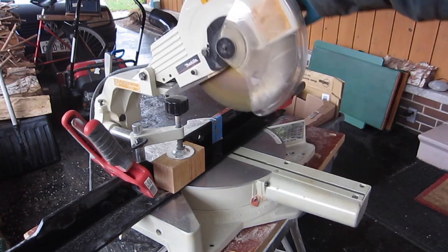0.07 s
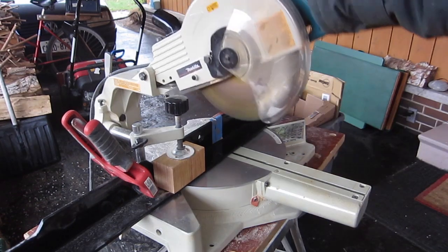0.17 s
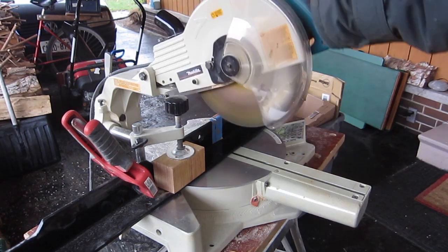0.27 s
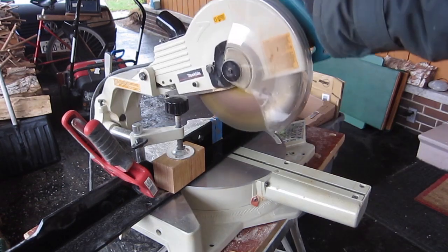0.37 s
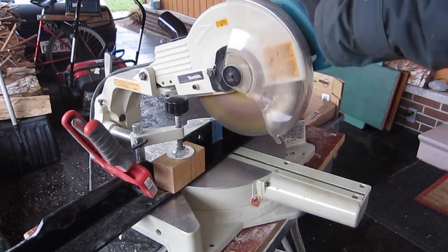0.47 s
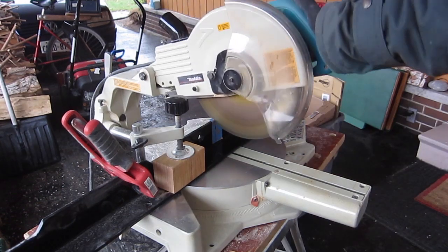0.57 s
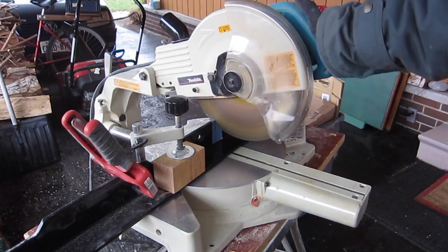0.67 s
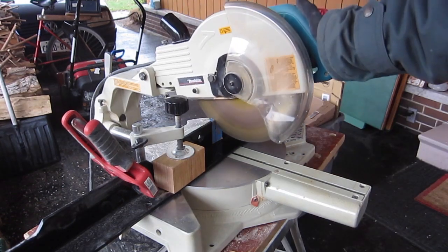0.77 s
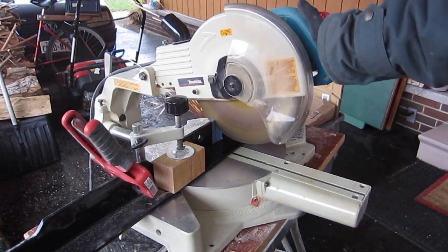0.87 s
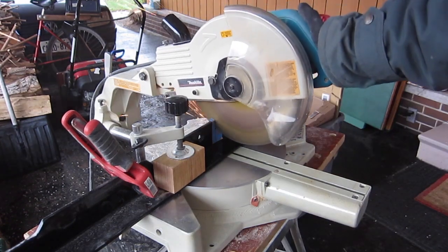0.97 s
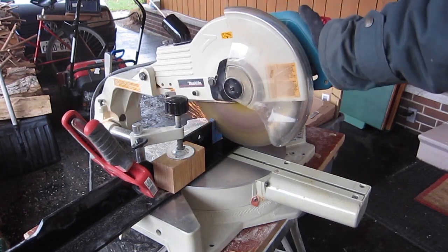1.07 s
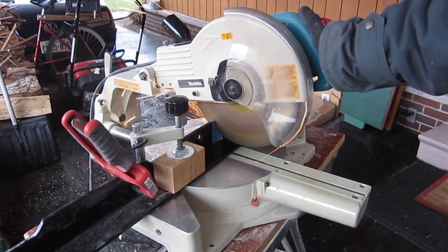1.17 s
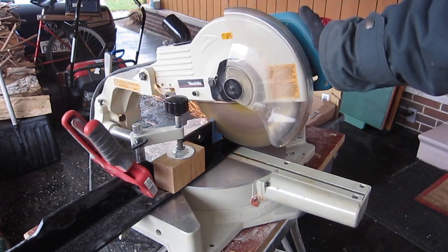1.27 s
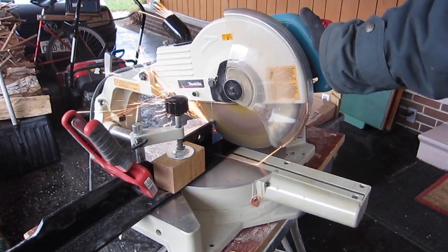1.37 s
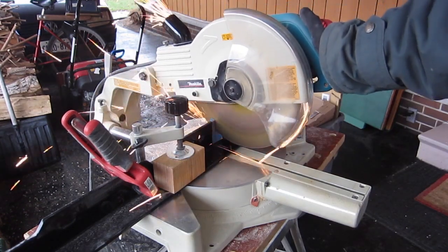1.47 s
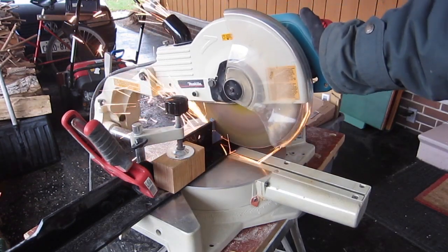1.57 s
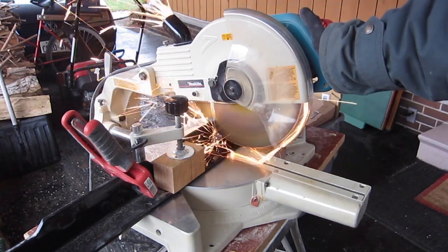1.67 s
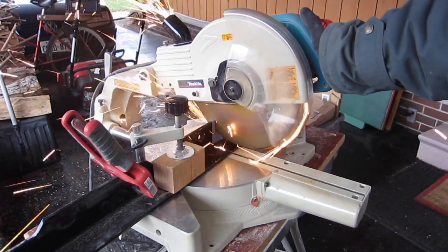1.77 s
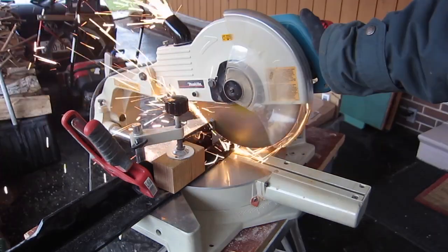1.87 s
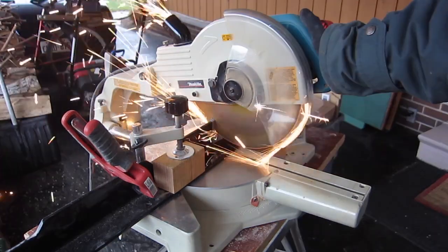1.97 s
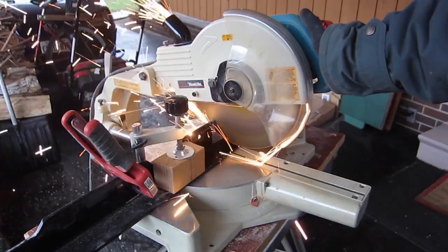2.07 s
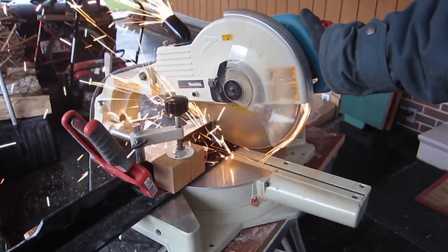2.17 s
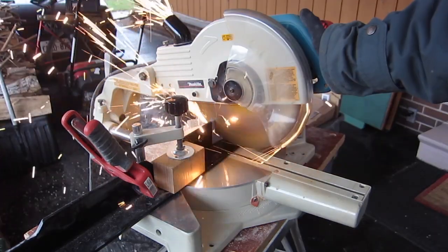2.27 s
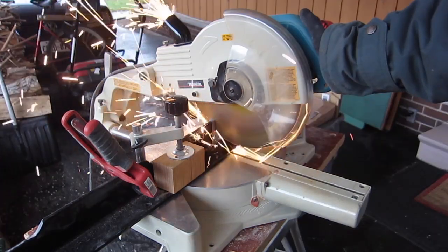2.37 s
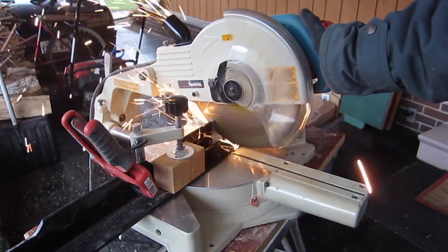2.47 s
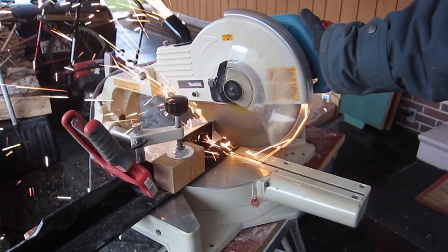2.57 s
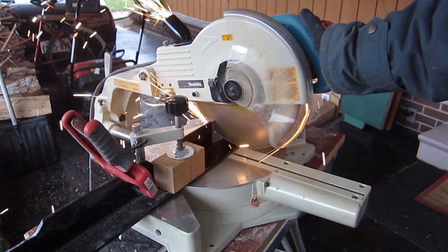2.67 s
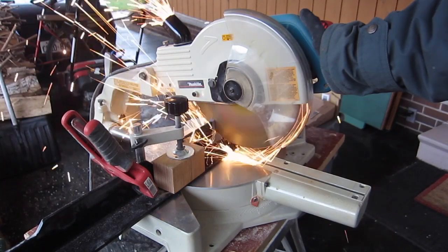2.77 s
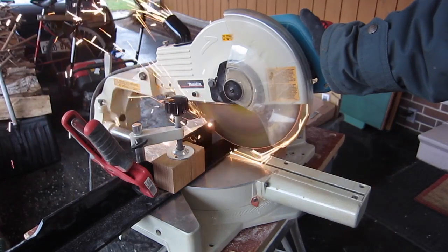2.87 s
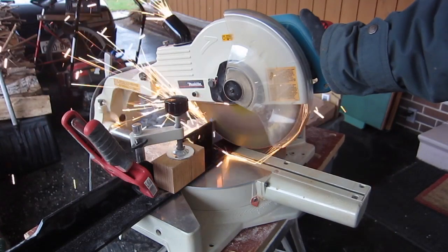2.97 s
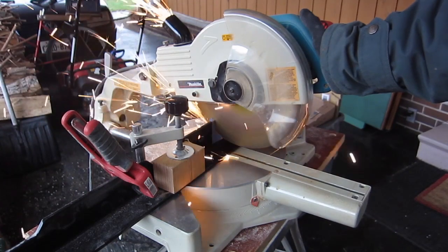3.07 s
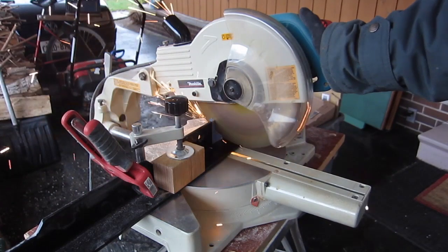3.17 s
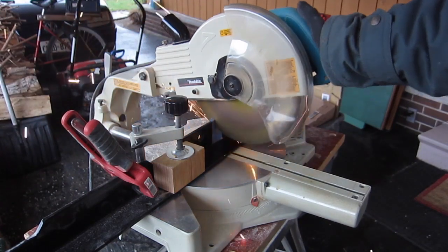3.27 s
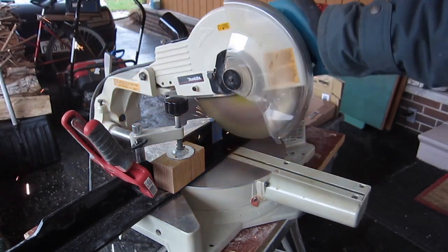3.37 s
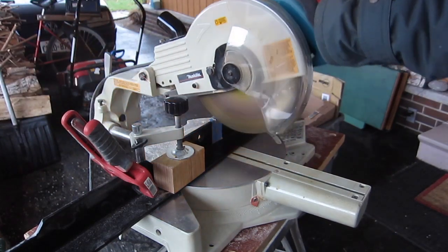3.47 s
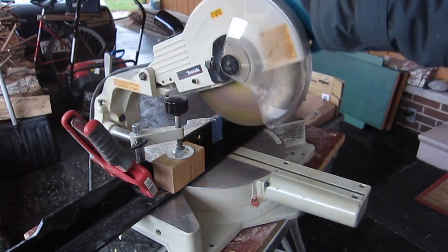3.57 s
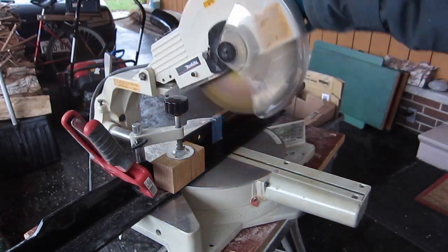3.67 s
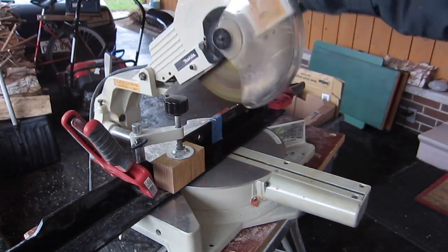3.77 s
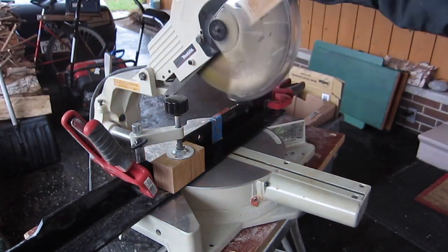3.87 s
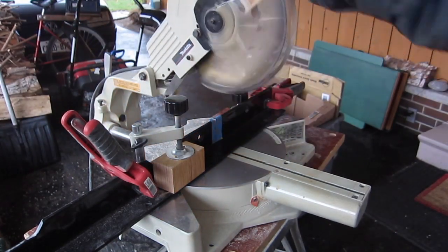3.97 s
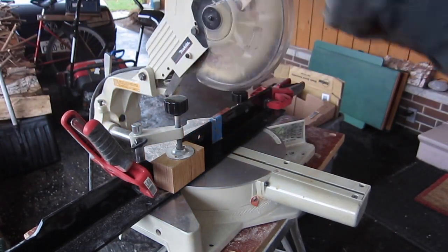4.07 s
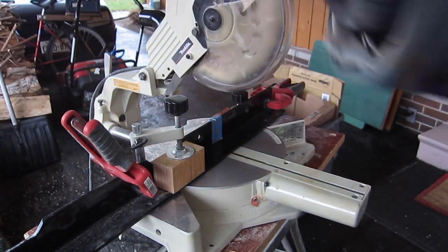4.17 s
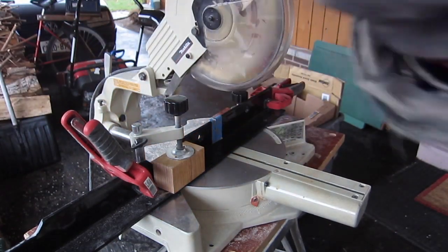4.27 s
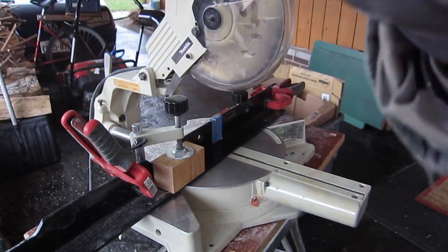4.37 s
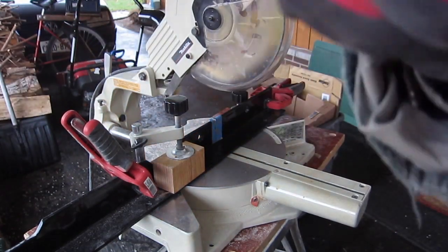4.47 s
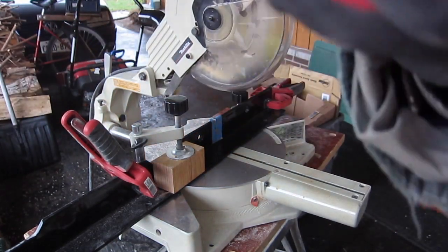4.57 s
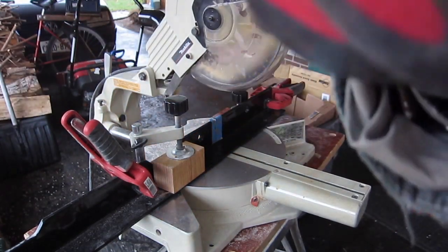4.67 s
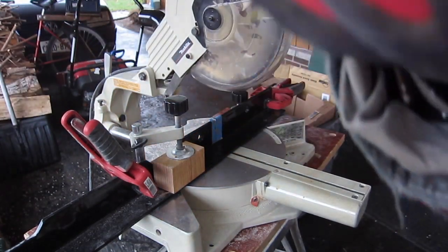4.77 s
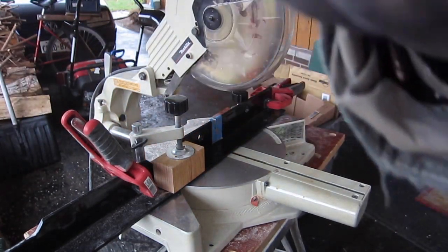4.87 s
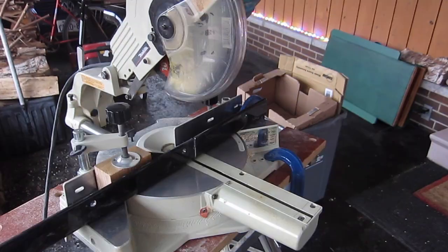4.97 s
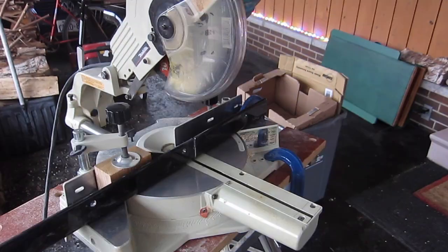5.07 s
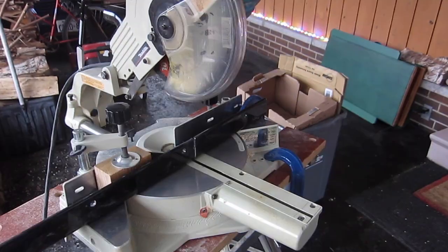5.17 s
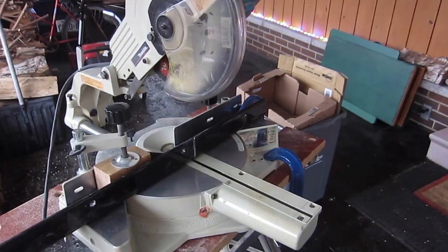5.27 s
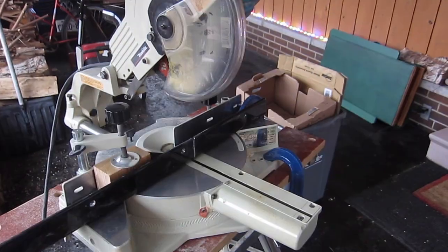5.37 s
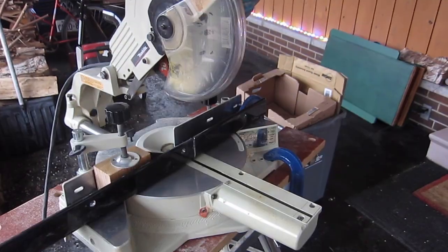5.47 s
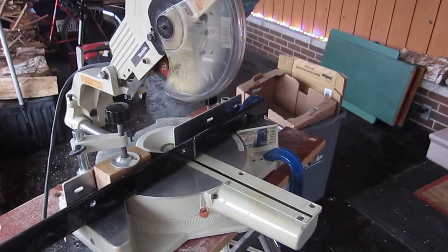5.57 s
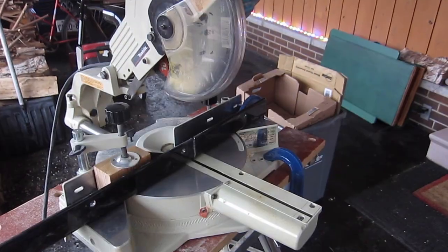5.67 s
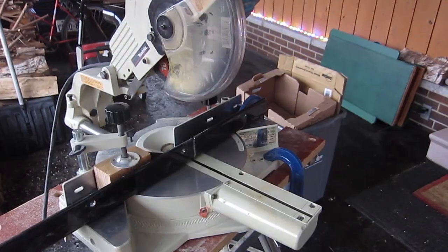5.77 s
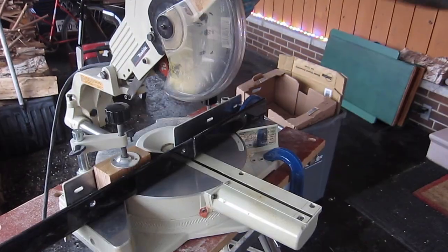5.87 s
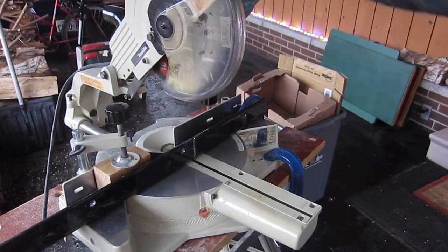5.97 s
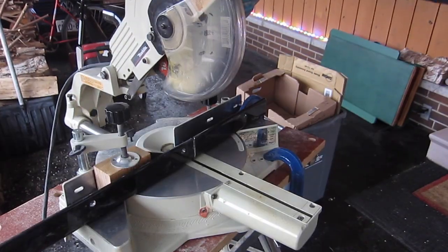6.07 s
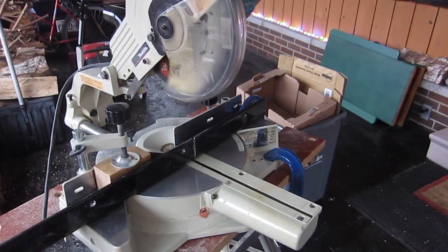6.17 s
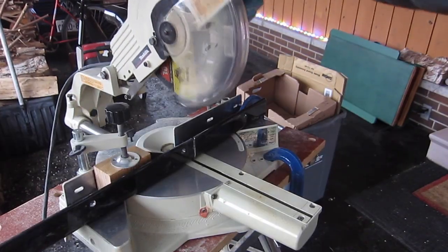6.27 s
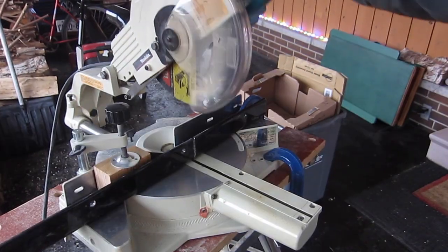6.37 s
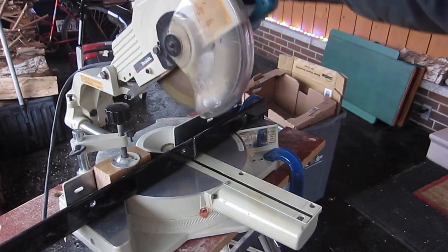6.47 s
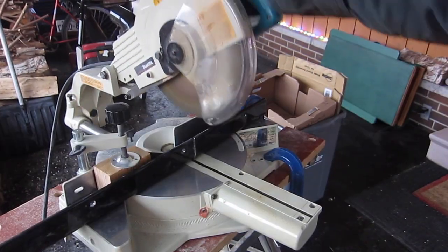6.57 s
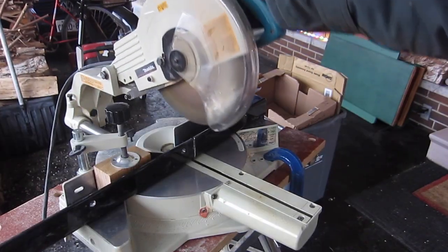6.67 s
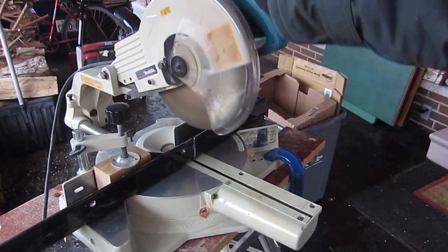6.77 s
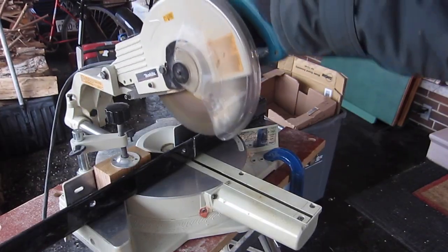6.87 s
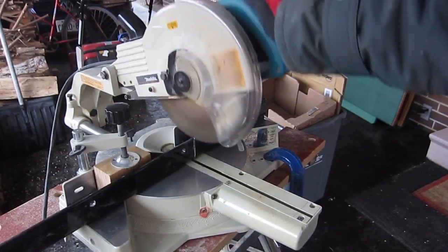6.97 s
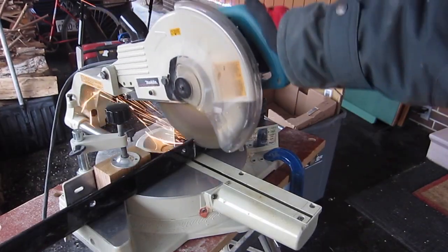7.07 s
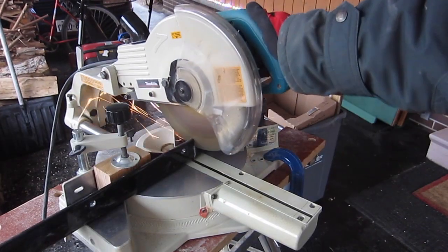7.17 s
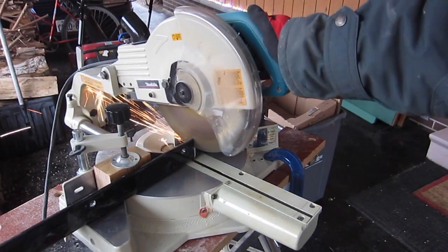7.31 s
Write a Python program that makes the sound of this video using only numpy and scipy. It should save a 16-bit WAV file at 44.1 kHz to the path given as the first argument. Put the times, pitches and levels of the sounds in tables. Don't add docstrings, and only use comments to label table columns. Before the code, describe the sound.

Close stereo pickup, short room: motor roar and gear whine climb, brief bright spits lead to a loud rough abrasive cut through a steel rail, pulsing with pressure. The tone plunges as the saw brakes, the arm clatters against its stop and sheet metal rings faintly. Sound cuts out abruptly, opens on a hushed shop with a soft knock and cloth ticks, then a jolting restart runs up into a second, slightly quieter, fizzing grind.

```python
import sys
import numpy as np
from scipy import signal
from scipy.fft import rfft, irfft, next_fast_len
from scipy.io import wavfile
from scipy.ndimage import uniform_filter1d

SR = 44100
rng = np.random.default_rng(int(sys.argv[2]) if len(sys.argv) > 2 else 0)


def unload_wav(signal):
    wavfile.write(
        sys.argv[1],
        SR,
        np.round(np.clip(np.atleast_2d(signal).T, -1, 1) * 32767).astype(np.int16),
    )


def boost_factor(decibels):
    exponent = np.asarray(decibels, float) / 20
    return 10 ** exponent


N = 323694
T = np.arange(N) / SR
PAD = next_fast_len(N)
HZ = np.maximum(np.fft.rfftfreq(PAD, 1 / SR), 1)
TEETH = 41
BRAKE_S = 3.4
SURGE_S = 0.29
TURN_SCATTER = 0.4
EVEN_S = 0.12
# switch-on in seconds, level in dB against the first start, seconds of one turn on which the gear binds.
STARTS = [
    (-.126, 0, .4688),
    (6.49, -2.5, 6.8254),
]
SECOND = T > 5
SINCE = T - np.where(SECOND, STARTS[1][0], STARTS[0][0])
BRAKED = np.where(SECOND, -1, T - BRAKE_S)
RUNNING = (T < 4.9) | (T > 6.489)


def saw():
    hz = speed()
    turns = np.cumsum(hz) / SR / TEETH
    touch = contact()
    driven_knock = np.clip((hz - 1200) / 1600, 0.15, 0.85)
    knock = np.where(BRAKED > 0, np.clip(hz / 3500, 0, 0.55), driven_knock)
    bind, beat = binding(turns)
    cut = grinding(turns)
    sound = body_noise(hz, knock, bind, beat, touch, cut)
    sound = sound + skipping(cut) + touch * (singing(beat) + thin_edge_fizz(cut))
    sound = sound + whine(hz, tone_levels(hz, touch), knock, bind, turns)
    sound = sound + shaft(hz, turns) + slot_hum(turns) + guard()
    engage = np.where(SECOND, np.clip(0.52 + SINCE / 0.063, 0, 1), 1)
    return uniform_filter1d(1.0 * RUNNING, 700) * engage * sound


# seconds after switch-on, tooth rate in Hz.
RUN_UP = [(0, 560.8), (.065, 959.3), (.158, 1568), (.24, 1902), (.36, 2191), (.51, 2440), (.8, 2733),
          (1.1, 2812), (1.5, 2885)]


def speed():
    sag_hz, brake_hz, crawl_hz, brake_tau_s = 72, 2765, 180, 0.32
    driven = curve(RUN_UP, SINCE) - sag_hz * feed()
    braked = crawl_hz + (brake_hz - crawl_hz) * np.exp(-BRAKED / brake_tau_s)
    braked = braked - 130 * np.clip(BRAKED - 0.8, 0, 0.8)
    return uniform_filter1d(np.minimum(driven, braked), size=1500)


# time in seconds, share of full feed (0-1).
FEED = [
    (.8, 0.05),
    (1.5, 0.15),
    (1.76, 0.53),
    (1.95, .8),
    (2.2, 0.99),
    (2.8, .9),
    (3.1, 0.71),
    (3.4, 0.53),
]


def feed():
    return curve(FEED) * ~SECOND


# time in seconds, contact (0-1).
CONTACT = [(0, 0), (.818, 0.02), (.824, 0.3), (.86, 0.35), (.915, 0.1), (.95, 0.9), (3.35, 0.93), (3.42, 0),
           (7.05, 0.02), (7.056, 0), (7.074, 0.98), (7.34, 0.99)]


def contact():
    return np.clip(curve(CONTACT), 0, 1)


# time in seconds, peak in dB.
BINDS = [(0.0194, -15.5), (0.0344, -17), (0.0843, -13.5), (0.1105, -28), (0.1425, -25.5), (0.1574, -11),
         (0.1785, -16), (0.2005, -19), (0.2195, -15), (0.24, -23), (0.2625, -33), (0.351, -10.5),
         (0.628, -16.5), (0.699, -20), (0.731, -20.5), (0.7733, -14), (0.821, -20.5), (0.8536, -19),
         (6.723, -14), (6.744, -15), (6.7654, -27), (6.783, -18), (6.8044, -13.5), (6.8268, -16.5),
         (6.8448, -15.5), (6.866, -20), (6.886, -25), (6.969, -8), (7.008, -12), (7.071, -23)]
# time in
# seconds, peak in dB.
GEAR_BEAT = [(0.9914, -13), (1.0432, -21.5), (1.1136, -19), (1.1914, -23), (1.3131, -4), (1.3845, -0.5),
             (1.459, -18), (1.55, -10.5), (1.5835, -6.5), (1.6194, -7), (1.6533, -18.5), (1.6948, -17.5),
             (1.7254, -6.5), (1.7608, 1.5), (1.8005, -23), (1.8304, -6.5), (1.8908, -3.5), (1.9254, -9),
             (1.9816, -14), (2.0165, -16), (2.0544, -11), (2.0879, -15), (2.1283, -7.5), (2.1896, -9.5),
             (2.222, -37), (2.2555, -8.5), (2.2979, -12.5), (2.3862, -13), (2.4575, -12), (2.5236, -10),
             (2.5527, -19.5), (2.5937, -13), (2.636, -14.5), (2.6678, -8), (2.7279, -7.5), (2.7946, -8.5),
             (2.8573, -9.5), (2.9394, -9.5), (3.0053, -8.5), (3.0663, -6), (3.11, -10.5), (3.1395, -17),
             (3.188, -21), (3.222, -12), (3.2737, -9.5)]


def binding(turns):
    first, second = (turns[int((bind_s + 0.003) * SR)] % 1 for _, _, bind_s in STARTS)
    each_db = -11.5 + 14.0 + STARTS[1][1] * SECOND - 5 * SINCE
    each = boost_factor(each_db) * throb(turns + 1 - np.where(SECOND, second, first), 5.1, 0.62)
    beat = np.where(SECOND, 0.4 + 0.1 * walk(15), 0.1 + bumps(GEAR_BEAT, 12.0, size=900))
    brake_turn = turns[int(2.7 * SR)] % 1
    braking = 1.22 * throb(turns + 1 - brake_turn, 1.13, 0.11)
    cutting = throb(turns, 3.9, TURN_SCATTER) * (0.15 + 1.14 * beat)
    loaded = np.where(BRAKED > 0, braking, cutting)
    speeding = (T < 0.9) | ((T > 6.7) & (T < 7.13))
    return np.where(speeding, np.maximum(bumps(BINDS, 18.4, size=560), each), loaded), beat


# frequency in Hz, gain in dB.
HOUSING = [(200, -31), (450, 1.5), (690, 0), (1000, -5), (1500, 2), (2100, 2), (2800, -1), (3300, -2.5),
           (4100, 2), (4700, 4), (5500, -7.5), (6400, -4), (7400, 5.5), (9000, 5)]
# frequency in Hz, width in Hz, lift in dB.
PANELS = [(437, 62, 4), (717, 74, 8), (890, 150, 5), (1008, 90, 9.5), (1330, 110, 4.5), (1560, 140, 3.5),
          (2155, 160, 2.5), (2900, 250, 7.5), (4080, 470, 4.5), (4780, 110, 4), (6270, 830, 6.5),
          (7570, 480, 10)]


def whine(hz, tones_db, knock, bind, turns):
    brake_blur = 0.3 + 0.45 * np.exp(-BRAKED / 0.15)
    brake_blur = brake_blur + 0.6 * np.clip(BRAKED - 1, 0, 1)
    blur = np.where(BRAKED > 0, brake_blur, 0.62 + 1.1 * np.exp(-np.abs(SINCE) / 0.22))
    out = 0
    for k, db in zip((1, 2, 3, 4, 6, 1.28, 7.7), tones_db):
        share = np.minimum(knock * (0.68 + 0.28 * (k - 1)), 0.97)
        wobble = blur * k ** 0.6 * walk(330)
        patchy_db = (1.1 + 0.4 * k) * flutter(40)
        panels_db = sum(lift / (1 + (2 * (k * hz - f) / w) ** 2) for f, w, lift in PANELS)
        level = boost_factor(db + read(HOUSING, k * hz) + panels_db + patchy_db)
        load = (1 - share + 2.58 * share * bind) * level
        out = out + load * np.sin(2 * np.pi * k * TEETH * turns + wobble)
    return 1.01 * out


# time in seconds, level in dB.
WHINE = [(0, -23.5), (.22, -24.5), (.3, -30), (.45, -29.5), (.6, -30), (.8, -30), (1.1, -35), (1.5, -32.5),
         (2.8, -34), (3.36, -40.5), (3.4, -37)]
# free level in dB, lift in the surge in dB,
# surge length as a factor, lift in the cut in dB.
OVERTONES = [(-44.5, 11.5, 1.45, 16.5), (-43.5, 13.5, 1.47, 0)]
# time in seconds, then first, second, third and fourth tone in dB.
BRAKE_TONES = [(3.4, -34, -45.5, -54, -64), (3.43, -26.5, -35.5, -48, -59), (3.5, -33.5, -33.5, -46, -51.5),
               (3.56, -27, -29, -35, -54.5), (3.61, -45.5, -33, -39.5, -50.5),
               (3.67, -31.5, -35, -47.5, -60), (3.71, -35, -37, -38, -35), (3.74, -46.5, -35, -49, -56),
               (3.77, -47.5, -41, -42.5, -40.5), (3.81, -44.5, -37, -45, -57), (3.88, -43, -41, -41, -46.5),
               (3.93, -32.5, -47.5, -34.5, -51), (4.0, -42.5, -44, -56.5, -53.5),
               (4.1, -54, -41.5, -47, -50), (4.17, -47, -51, -56.5, -64), (4.21, -58, -50, -54, -58),
               (4.38, -68, -45, -56, -60.5), (4.41, -63, -60, -65, -55), (4.6, -64, -57, -60.5, -61.5),
               (4.88, -73, -64, -71, -66.5)]
# time in seconds, then first, second, third and fourth tone in dB.
RESTART_TONES = [(6.49, -42, -36.5, -39, -56), (6.56, -36, -25.5, -39, -50.5),
                 (6.61, -27.5, -29, -31.5, -51.5), (6.68, -28.5, -29.5, -30.5, -49.5),
                 (6.75, -28, -31, -34, -56.5), (6.85, -28, -42, -45.5, -55),
                 (6.92, -31.5, -40, -40.5, -63.5), (7.0, -29, -44.5, -46, -58),
                 (7.08, -27.5, -44, -50.5, -60.5), (7.2, -31.5, -41, -48, -64),
                 (7.34, -32, -45.5, -43.5, -65)]


def tone_levels(hz, touch):
    second, third = (free + lift * surge(length * SURGE_S) + in_cut * touch
                     for free, lift, length, in_cut in OVERTONES)
    driven = np.array([curve(WHINE), second, third, third - 20])
    s, *columns = np.transpose(BRAKE_TONES + RESTART_TONES)
    listed = [np.interp(T, s, column) for column in columns]
    first, second, third, fourth = np.where(T < BRAKE_S, driven, listed)
    commutator = first - 4 - 45 * np.abs(T - 3.55) - 40 * touch
    late_db = np.where(BRAKED > 0.4, 0, -30)
    return [first, second, third, fourth, fourth - 6.5 + late_db, commutator, fourth - 3 + late_db]


def surge(length_s):
    return 1 / (1 + np.abs(SINCE / length_s) ** 6)


# frequency in Hz, width in Hz, level in dB.
RAIL = [(676, 84, 1.5), (2150, 89, -24.5), (2830, 77, -3), (3172, 84, -1), (3473, 45, -2.5),
        (3720, 90, -12), (4130, 78, -9), (4470, 150, -9), (4930, 63, -13.5), (5304, 76, -4),
        (6010, 110, -4.5), (6610, 120, -4), (7260, 41, -11.5), (7260, 200, -14), (7770, 75, -8),
        (8670, 130, -16), (10030, 170, -17)]
# frequency in Hz, level in dB per Hz.
CUT = [(24, -71.5), (40, -41.5), (208, -18), (310, -18), (400, -10.5), (520, -10), (674, -6.5), (1260, -8),
       (2070, -7), (2600, -9), (2800, -9.5), (3970, -8.5), (5920, -11), (9060, -13.5), (11300, -26.5),
       (13900, -27.5), (15700, -27)]


def grinding(turns):
    return shape(grit(turns), boost_factor(read(CUT, HZ)) * humps(RAIL, 1.8, 1100))


def grit(turns):
    rim = rng.standard_normal((2, 640))
    worn = 2 * np.pi * 0.422 * T
    places = np.arange(640) / 640
    again = sum(w * np.interp(turns % 1, places, r) for w, r in zip((np.sin(worn), np.cos(worn)), rim))
    chips = rng.standard_normal(N) * boost_factor(1.3 * rng.exponential(size=N))
    torn = (unit(chips) + 0.23 * again) * (1 + 0.81 * throb(turns, 1.6, TURN_SCATTER))
    return unit(torn / np.sqrt(uniform_filter1d(torn ** 2, int(EVEN_S * SR))))


# frequency in Hz, level in dB per Hz.
FAN = [(24, -71.5), (40, -66), (110, -46), (200, -21.5), (310, -16.5), (400, -7), (625, -4.5), (1500, -7),
       (1880, -2.5), (2240, -6.5), (2730, -4), (3020, -6), (5640, -12), (7610, -14.5), (10300, -28),
       (11300, -65), (12900, -34.5), (15700, -50)]
# frequency in Hz, level in dB per Hz.
COAST = [(24, -69.5), (40, -36), (97, -34.5), (374, -13), (453, -3), (524, -21), (576, 0), (682, -3),
         (807, -18.5), (1030, -12.5), (1190, -15.5), (1620, -13), (2320, -13), (3760, -14.5),
         (10500, -32.5), (11300, -59.5), (12300, -42), (15500, -45), (16200, -80), (22000, -120)]
# frequency in Hz, width in Hz, level in dB.
FRAME = [(447, 180, -6.5), (722, 76, 2), (1090, 42, -11), (1640, 35, -4.5), (2080, 65, -11.5),
         (2800, 31, -17.5), (2980, 24, -21), (3940, 35, -15.5), (4300, 40, -12.5), (5130, 38, -16)]
# start and end in seconds, lift in dB.
SHUDDERS = [
    (3.4, 3.459, 7),
    (4.172, 4.391, 6.5),
    (4.789, 4.876, 12.5),
    (6.495, 6.603, 3.5),
    (6.93, 7.039, 5.5),
]
# dB as the surge ends, fall before it in dB per s, rise after it in dB per s,
# dB in the cut, fade in dB per s, dB at the brake, fall in dB per s, second start in dB.
ROAR = (-34, 10.5, 13.5, -26, 0.67, -36, 17, -6)
HISS = (-39, 17.5, 7.5, -29.5, .5, -38, 21.5, -3.5)


def body_noise(hz, knock, bind, beat, touch, cut):
    shudder_db = sum(db * ((T > a) & (T < b)) for a, b, db in SHUDDERS)
    body_db = airflow(ROAR, touch) + uniform_filter1d(1.0 * shudder_db, size=600) + 0.7 * flutter(25)
    chatter_db = 0.9 * flutter(70) + 1.0 * flutter(30) + 1.7 * beat
    hiss_db = airflow(HISS, touch) + touch * chatter_db - 1.6
    fan = shape(rng.standard_normal(N), boost_factor(read(FAN, HZ)) * humps(RAIL[:1], 0.0, 900))
    coast = shape(rng.standard_normal(N), boost_factor(read(COAST, HZ)) * humps(FRAME, 3.2, 300))
    slow = np.clip((2500 - hz) / 1500, 0, 1) * (T > 2) * (T < 5)
    rattle = 1 - 0.25 * knock + 0.56 * knock * bind
    shares = (rattle * np.sqrt((1 - touch) * (1 - slow)), np.sqrt(touch), np.sqrt((1 - touch) * slow))
    return sum(share * split(x, body_db, hiss_db, 1180, (300, 1150), (5000, 6000))
               for share, x in zip(shares, (fan, cut, coast)))


def airflow(law, touch):
    dip_db, before, after, cut_db, fade, *rest = law
    late = SINCE - SURGE_S
    free_db = dip_db + np.where(late < 0, -before * late, after * np.minimum(late, 0.6))
    return phases((1 - touch) * free_db + touch * (cut_db - fade * SINCE), *rest)


def phases(driven_db, brake_db, fall, second_db):
    level_db = np.where(BRAKED > 0, brake_db - fall * BRAKED, driven_db + second_db * SECOND)
    return uniform_filter1d(level_db, size=900)


# time in seconds, level in dB.
SKIPS = [
    (.8257, -18.5),
    (0.855, -28.5),
    (.872, -21),
    (0.898, -23),
    (0.928, -27.5),
    (7.0552, -34),
    (7.072, -25),
]


def skipping(cut):
    spits = sum(boost_factor(db) * np.exp(-np.abs(T - s) / np.where(T < s, 0.001, 0.006)) for s, db in SKIPS)
    return spits * unit(shape(cut, 1 / (1 + (5600 / HZ) ** 6)))


def thin_edge_fizz(cut):
    return SECOND * boost_factor(-41.5) * unit(shape(cut, 1 / (1 + (9500 / HZ) ** 8)))


# frequency in Hz, width in Hz, level in dB.
PUMPED = [(2120, 430, -1.5), (2827, 240, 0)]
# frequency in Hz, width in Hz, level in dB.
FRESH_EDGE = [(3100, 70, -5), (4550, 61, -1.5), (5270, 110, -1.5), (6040, 150, 6.5), (6700, 84, -5),
              (9200, 150, -1)]


def singing(beat):
    press = feed()
    pumped_db = -46.5 + 23 * press
    break_through_db = 10.5 * np.exp(-((T - 3.1) / 0.2) ** 2)
    edge_db = -29.5 - 3 * SECOND - 20 * press + break_through_db
    pumped = 0.66 * sum(boost_factor(db) * np.sin(2 * np.pi * hz * T + 1.4 * walk(w)) for hz, w, db in PUMPED)
    edge = unit(shape(rng.standard_normal(N), humps(FRESH_EDGE, 0.0, np.inf) - 1))
    return boost_factor(pumped_db) * 2.0 * beat * pumped + boost_factor(edge_db + 2.5 * flutter(18)) * edge


# multiple of wheel speed, level in dB.
SHAFT = [(1, -63.5), (2, -73.5), (3, -57), (4, -64), (5, -77.5)]


def shaft(hz, turns):
    up = np.clip((hz - 2100) / 500, 0, 1) * (T < 5)
    return 1.66 * up * sum(boost_factor(db + 2.0 * walk(3.7)) * np.sin(2 * np.pi * k * turns) for k, db in SHAFT)


# time in seconds, level in dB.
SLOT_HUM = [(.7, -50.5), (.95, -39), (1.15, -31), (1.45, -29.5), (1.75, -39), (1.9, -47), (2.1, -36.5),
            (2.35, -39), (2.6, -40.5), (3.0, -39), (3.35, -43), (3.4, -87)]


def slot_hum(turns):
    level = boost_factor(curve(SLOT_HUM) + 1.5 * flutter(25))
    return level * np.sin(2 * np.pi * 1.1 * TEETH * turns + 0.8 * walk(90))


# frequency in Hz, width in Hz, level in dB.
GUARD = [(1037, 40, 4.5), (1600, 40, 3), (1705, 58, 1), (2105, 60, 0.5), (2810, 50, -3.5), (3030, 30, -6.5),
         (3640, 40, -5), (3730, 60, -2), (4290, 46, -14.5)]


def guard():
    on = np.clip((BRAKED - 0.5) / 0.2, 0, 1)
    sheet = unit(shape(rng.standard_normal(N), humps(GUARD, 0.0, np.inf) - 1))
    return on * boost_factor(-50.5 - 9.5 * (BRAKED - 0.94)) * sheet


# time in seconds, level in dB.
STOP_HITS = [
    (4.0605, -19.5),
    (4.065, -24.5),
    (4.0685, -23.5),
    (4.0725, -24),
    (4.0775, -18.5),
    (4.081, -26),
    (4.085, -26),
    (4.09, -29),
    (4.097, -28.5),
    (4.305, -39),
]
# frequency in Hz, level in dB, t60 in seconds.
STOP = [(427, 2, 0.33), (1050, 3, 5.0), (1460, 4.5, 0.48), (2137, -1, 0.26), (2380, -1, 0.11),
        (2590, -0.5, 0.12), (3220, -18, 0.15), (3730, -17.5, 0.22), (4470, -24.5, 0.14), (4635, -29, 0.13)]


def upper_stop():
    return ring(STOP_HITS, STOP, 0.057, -1.6, 0.0023)


# time in seconds, level in dB.
THUD_HIT = [
    (5.661, -28),
]
# frequency in Hz, level in dB, t60 in seconds.
THUD = [(363, 0, 0.15), (522, -8.5, 0.42), (680, -6, 0.26), (1448, -26.5, 5.0)]


def thud():
    return ring(THUD_HIT, THUD, 0.09, -26.0, 0.002)


# time in seconds, level in dB.
JOLT_HITS = [
    (6.5, -19),
    (6.52, -13.5),
    (6.545, -18.5),
    (6.58, -18),
]
# frequency in Hz, level in dB, t60 in seconds.
JOLT = [(683, 3, 0.29), (694, -9.5, 0.33), (1002, 2.5, 0.11), (1200, -16, 0.067), (1546, -5.5, 0.15),
        (2140, -11, 0.083)]


def starting_jolt():
    return ring(JOLT_HITS, JOLT, 0.35, -28.0, 0.0078)


def ring(hits, modes, longest_s, crack_db, crack_s):
    out, t = np.zeros(N), np.arange(SR // 3) / SR
    for s, db in hits:
        y = np.zeros(len(t))
        for f, mode_db, t60 in modes:
            level_chance, pitch_chance = rng.standard_normal(2)
            tone = np.sin(2 * np.pi * f * (1 + 0.024 * pitch_chance) * t)
            y += boost_factor(mode_db + 2.8 * level_chance) * tone * 1000.0 ** (-t / min(t60, longest_s))
        crack = rng.standard_normal(len(t)) * np.exp(-t / crack_s)
        i = int(s * SR)
        out[i:i + len(t)] += boost_factor(db) * (y / np.abs(y).max() + boost_factor(crack_db) * crack)
    return shape(out, 1 / (1 + (220 / HZ) ** 4) / (1 + (HZ / 7000) ** 5))


# time in seconds, peak in dB, rise in seconds, fall in seconds, centre in Hz.
SCUFFS = [
    (5.823, -52.5, 0.0063, .03, 6470),
    (6.111, -51.5, 0.004, 0.013, 2600),
    (6.14, -46, 0.0073, 0.012, 4630),
    (6.281, -41.5, 0.002, 0.0071, 4200),
    (6.415, -41, 0.0064, 0.018, 6700),
    (6.5, -44.5, .004, 0.011, 5020),
]


def scuffs():
    out = np.zeros(N)
    t = np.arange(-4096, 12288) / SR
    f = np.maximum(np.fft.rfftfreq(len(t), 1 / SR), 1)
    for s, db, rise, fall, hz in SCUFFS:
        grains = rng.standard_normal(len(t)) * boost_factor(2.7 * rng.exponential(size=len(t)))
        band = np.exp(-(np.log(f / hz) / 0.57) ** 2) / (1 + (f / 9500) ** 10)
        cloth = unit(irfft(rfft(grains) * band))
        i = int((s + t[0]) * SR)
        out[i:i + len(t)] += boost_factor(db) * np.exp(-np.abs(t) / np.where(t < 0, rise, fall)) * cloth
    return out


# frequency in Hz, level in dB per Hz.
SHOP = [(15, -73), (25, -38), (101, -8), (262, -2.5), (323, -8.5), (358, -11.5), (386, -3.5), (451, -7),
        (555, -5.5), (883, -2), (1300, -14), (5970, -38.5), (12000, -62.5), (15600, -108), (22000, -120)]
STIRS_S = (6.134, 6.274, 6.47)


def shop():
    quiet_s = 5.08
    stirs_db = sum(3.5 * np.exp(-((T - s) / 0.018) ** 2) for s in STIRS_S)
    creep_db = 5.5 * np.maximum(T - quiet_s, 0) + stirs_db
    early = T < quiet_s - 0.02
    low_db = -48 - 4.3 * early + 0.58 * creep_db + 0.53 * walk(6)
    high_db = -53 + 3 * early + 1.09 * creep_db + 0.5 * walk(4.1)
    restart = np.where(RUNNING, boost_factor(-34.0), 1)
    coasting = np.where(T < 4.9, boost_factor(-7.5 + 10.0 * (T - 4.5)), restart)
    duck = np.where(T < 3.6, boost_factor(-22.5), coasting)
    air = shape(rng.standard_normal(N), boost_factor(read(SHOP, HZ)) / (1 + (HZ / 9300) ** 14))
    hum = uniform_filter1d(duck, 1500) * split(air, low_db, high_db, 2000, (100, 1200), (1500, 6000))
    bench = unit(shape(rng.standard_normal(N), 1 / (1 + (HZ / 120) ** 6) / (1 + (55 / HZ) ** 6)))
    return hum + (T > 3.5) * (T < 5.5) * boost_factor(-71.5) * bench


def curve(table, at=T):
    return np.interp(at, *np.transpose(table))


def read(table, hz):
    f, v = np.transpose(table)[:2]
    return np.interp(np.log(hz), np.log(f), v)


def unit(x):
    return x / np.sqrt(np.mean(x ** 2))


def shape(x, gain):
    return irfft(rfft(x, PAD) * gain, PAD)[..., :N]


def humps(peaks, lift_db, trend_hz):
    power = sum((boost_factor(db + f / trend_hz) / (1 + ((HZ - f) / (w / 2)) ** 2)) ** 2 for f, w, db in peaks)
    return 1 + boost_factor(lift_db) * np.sqrt(power)


def split(x, low_db, high_db, edge_hz, low, high):
    s = rfft(x, PAD)
    top = 1 / np.sqrt(1 + (edge_hz / HZ) ** 8)
    low_rms, high_rms = (np.sqrt(2 * np.sum(np.abs(s[(HZ > a) & (HZ < b)]) ** 2)) / N for a, b in (low, high))
    bass = irfft(s * (1 - top), PAD)[:N] / low_rms
    treble = irfft(s * top, PAD)[:N] / high_rms
    return boost_factor(low_db) * bass + boost_factor(high_db) * treble


def walk(rate):
    k = int(SR / rate)
    held = np.repeat(rng.standard_normal(N // k + 1), k)
    return unit(uniform_filter1d(uniform_filter1d(held, k), k)[:N])


def flutter(rate):
    x = walk(rate)
    return unit(x - uniform_filter1d(x, int(EVEN_S * SR)))


def throb(turns, sharp, scatter):
    size = np.clip(1 + scatter * rng.standard_normal(int(turns[-1]) + 2), 0, 2)
    return np.exp(sharp * (np.cos(2 * np.pi * turns) - 1)) * size[np.round(turns).astype(int)]


def bumps(rows, lift_db, size):
    s, db = np.transpose(rows)
    marks = np.zeros(N)
    marks[(s * SR).astype(int)] = np.minimum(boost_factor(db + lift_db), 1.8)
    return signal.fftconvolve(marks, np.hanning(size))[size // 5:N + size // 5]


# frequency in Hz, level in dB.
WIDTH = [(60, -9.5), (110, -21.5), (200, -18), (380, -18.5), (700, -25), (1290, -21.5), (2380, -9.5),
         (4400, -6.5), (8120, -6.5), (15000, -5.5)]
# frequency in Hz, difference in dB.
LEAN = [(60, 1.5), (110, -1), (200, -0.5), (380, -0.5), (700, -.1), (1290, 0), (2380, -2.5), (4400, -0.5),
        (8120, 2), (15000, -3)]


def scene():
    dry = saw() + scuffs() + upper_stop() + thud() + starting_jolt()
    t = np.arange(SR // 2) / SR
    walls = rng.standard_normal(len(t)) * 1000.0 ** (-t / 0.37) * (t > 0.004)
    room = signal.fftconvolve(dry, walls / np.linalg.norm(walls))[:N]
    mid = dry + boost_factor(-11.0) * room + shop()
    apart = rng.standard_normal(len(t)) * np.exp(-t / 0.062)
    smear = rfft(apart, PAD)
    side = shape(mid, boost_factor(read(WIDTH, HZ)) * smear / np.abs(smear))
    side = side + shape(np.roll(mid, 5000), boost_factor(-14.5) / (1 + (HZ / 300) ** 2)) + boost_factor(-13.0) * shop()
    lean = boost_factor(read(LEAN, HZ) / 2)
    return np.array([shape(mid + side, lean), shape(mid - side, 1 / lean)])


def low_pass(x):
    return signal.sosfilt(signal.butter(12, 15850, fs=SR, output="sos"), x)


# time in seconds, gain in dB.
SCENE_CHANGE = [
    (0, 0.5),
    (4.87, -0.5),
    (4.878, -31.5),
    (4.9, -95),
    (4.983, -87),
    (4.998, -11.5),
    (5.03, 4),
    (7.34, -0.5),
]


def record(dry):
    notch = 1 - 0.995 * np.exp(-((HZ - 11350) / 620) ** 4)
    response = notch / np.sqrt(1 + (55 / HZ) ** 4) / (1 + (HZ / 15300) ** 60)
    heard = shape(0.52 * np.tanh(dry / 0.52), response)
    return low_pass(heard * boost_factor(curve(SCENE_CHANGE)))


dry = scene()
out = record(dry)
unload_wav(out)
```